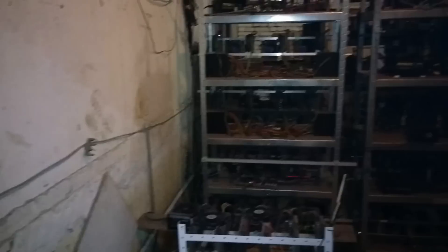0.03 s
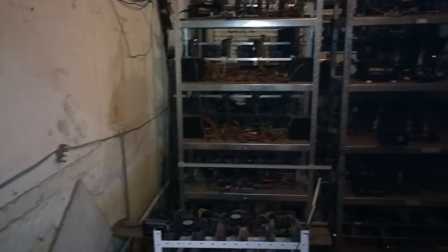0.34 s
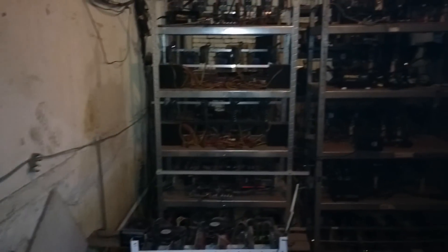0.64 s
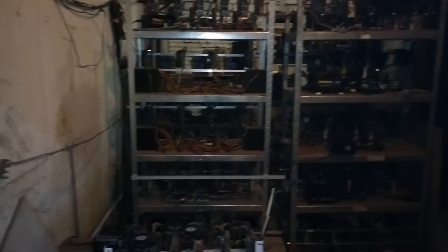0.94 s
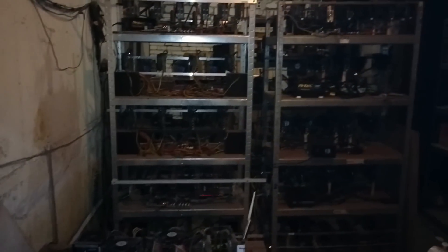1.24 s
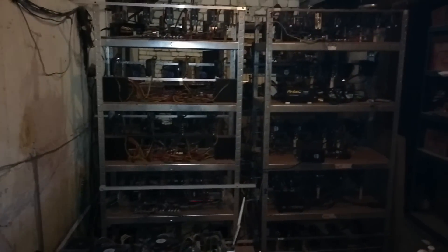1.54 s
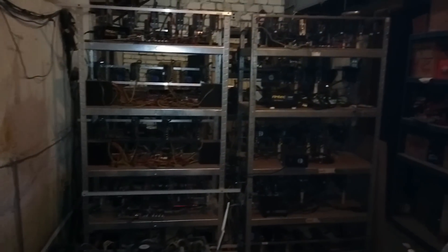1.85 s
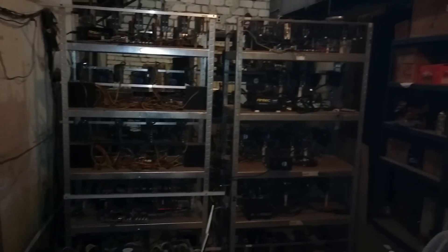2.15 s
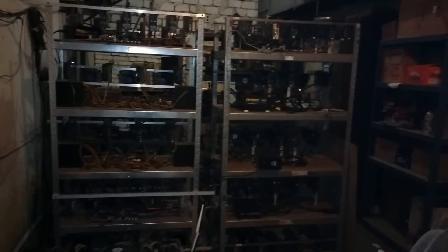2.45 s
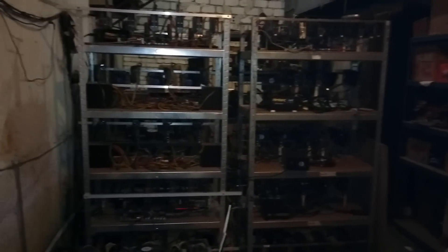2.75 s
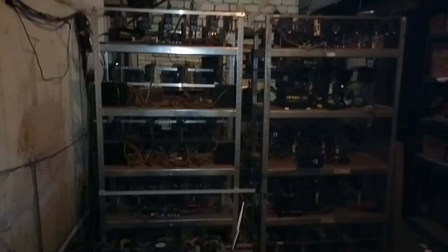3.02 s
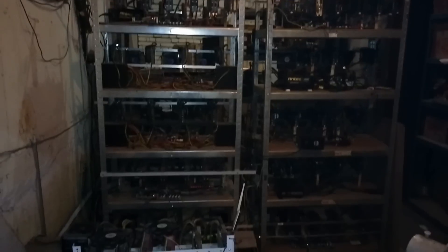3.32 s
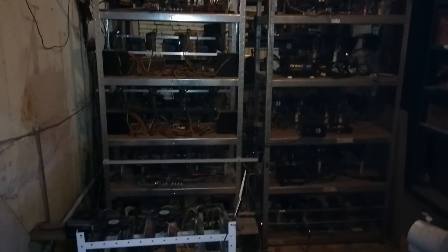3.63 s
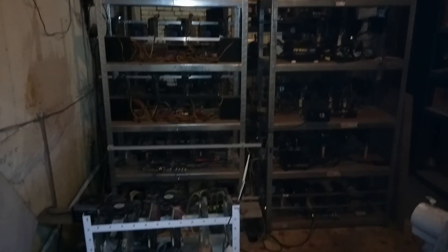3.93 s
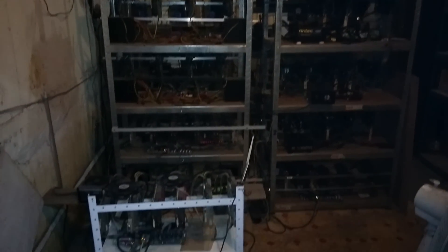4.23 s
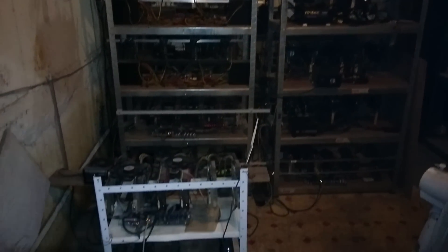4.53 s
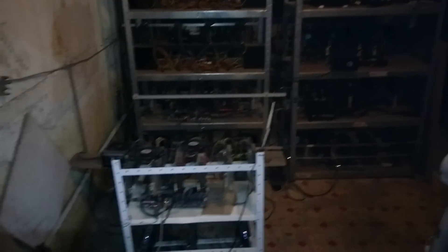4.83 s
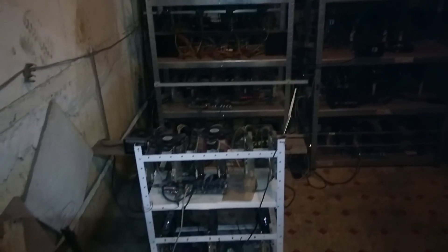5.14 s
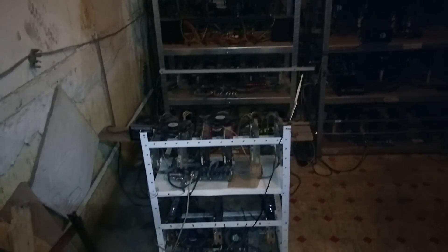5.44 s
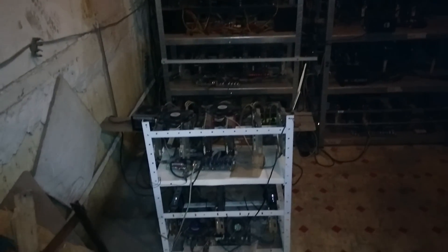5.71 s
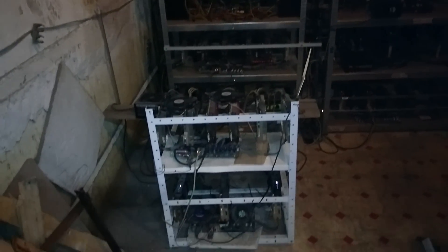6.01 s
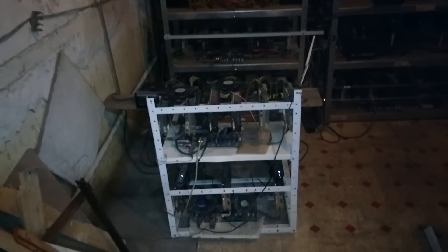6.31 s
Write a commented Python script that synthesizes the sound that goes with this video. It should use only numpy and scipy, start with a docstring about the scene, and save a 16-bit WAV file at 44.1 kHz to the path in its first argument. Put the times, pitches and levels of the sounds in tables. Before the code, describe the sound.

Racks of computer rigs fill a small bare room with the loud, steady roar of cooling fans. One strong fan gives a low hum that wavers and briefly drops out, while many smaller fans whirr over rushing air. A thin, grainy hiss comes and goes, and soft low buffets of draught bump now and then. The hand-held microphone moves slowly nearby, so the tone shifts slightly.

```python
"""Computer fans in a small bare room

Racks of computer rigs run while a hand-held microphone moves slowly in front of them. One strong fan
hums at its blade rate and a neighbour beats against it; many small ones whirr at speeds of their own
over a roar of turbulent air. The room booms at a few modes, the draught buffets now and then,
and a thin grainy hiss comes and goes."""
import sys
import numpy as np
from scipy import signal
from scipy.fft import rfft, irfft
from scipy.io import wavfile
from scipy.ndimage import uniform_filter1d, minimum_filter1d, map_coordinates

SR = 44100
rng = np.random.default_rng(int(sys.argv[2]) if len(sys.argv) > 2 else 0)


def int16_out(signal):
    """Quantize to a 16-bit WAV file."""
    q = np.round(np.clip(np.atleast_2d(signal).T, -1, 1) * 32767)
    wavfile.write(sys.argv[1], SR, q.astype(np.int16))


N = 280917
TIME_S = np.arange(N) / SR


def undb(db):
    """Amplitude ratio of a level in decibels."""
    return 10 ** (np.asarray(db) / 20)


def unit(x):
    """Normalisation to an rms of 1."""
    return x / np.sqrt(np.mean(x ** 2))


def envelopes(table):
    """Interpolation in decibels: one gain curve for each level column of a table."""
    times, *levels = np.transpose(table)
    return [undb(np.interp(TIME_S, times, db)) for db in levels]


def drift(rate_hz):
    """Smoothed sample-and-hold noise with an rms of 1."""
    hold = max(int(SR / rate_hz), 1)
    steps = rng.standard_normal(4096)[np.arange(N) // hold % 4096]
    return unit(uniform_filter1d(uniform_filter1d(steps, hold), hold))


# The strong fan's speed. Each row: time in seconds, blade rate in Hz.
BLADE_RATE = [(0, 187), (1, 186.6), (3.3, 186.75), (3.8, 187.05), (6.37, 187.05)]
# Its standing wave along the microphone's path. Each row: time in seconds, level in dB.
HUM_LEVEL = [(0.2, -20), (0.38, -14.5), (1.6, -14.5), (1.85, -31), (2.05, -15), (2.25, -24), (2.55, -11.5),
             (2.8, -17), (3.5, -20), (3.95, -16), (4.45, -18.5), (4.75, -24), (4.9, -12.5), (5.15, -13.5),
             (5.42, -25), (5.55, -13.5), (5.9, -12.5), (6.2, -15.5), (6.37, -16)]
# Brief dips of the hum. Each row: centre in seconds, half length in seconds, depth in dB.
HUM_DIPS = [(0.641, 0.027, 24), (0.933, 0.026, 15), (1.074, 0.012, 7), (1.264, 0.032, 11.5),
            (1.482, .012, 10), (2.148, 0.038, 38), (2.287, 0.09, 17), (2.86, 0.02, 8), (3.012, 0.025, 12),
            (3.433, 0.023, 35), (3.606, 0.043, 17), (3.898, 0.0089, 13), (4.107, 0.014, 26),
            (4.306, 0.057, 17), (4.792, 0.039, 29.5), (5.117, 0.054, 20), (5.217, 0.021, 15),
            (5.726, 0.036, 23), (6.003, 0.041, 8.5)]
def strong_fan(sway_rad, shake_rad, throb_db, waver_db):
    """Blade-passing tone: uneven inflow modulates its phase and amplitude; at times it drops out."""
    blade_hz = np.interp(TIME_S, *np.transpose(BLADE_RATE))
    phase = 2 * np.pi * np.cumsum(blade_hz) / SR + sway_rad * drift(4.5) + shake_rad * drift(26)
    flutter = undb(throb_db * drift(34) - waver_db * np.abs(drift(16)))
    dips_db = sum(db * np.exp(-((TIME_S - s) / half_s) ** 2) for s, half_s, db in HUM_DIPS)
    return envelopes(HUM_LEVEL)[0] * unit(np.sin(phase) * flutter) * undb(-dips_db)


def neighbour_fan(blade_hz, wander, throb_db):
    """Beating: a faster, less steady blade tone interferes with that of the strong fan."""
    phase = 2 * np.pi * np.cumsum(blade_hz * (1 + wander * drift(14))) / SR
    return unit(np.sin(phase) * undb(throb_db * drift(12)))


def small_fans(slow_hz, fast_hz, wander, count, harmonics):
    """Superposition: each fan adds a harmonic series on its own slightly wandering blade rate."""
    cycle = np.arange(1024) / 1024
    whirr = np.zeros(N)
    for blade_hz in rng.uniform(slow_hz, fast_hz, count):
        wave = sum(np.sin(2 * np.pi * (k * cycle + rng.random())) for k in range(1, harmonics + 1))
        passes = np.cumsum(blade_hz * (1 + wander * drift(9))) / SR
        whirr += wave[(passes * len(cycle)).astype(int) % len(cycle)]
    return unit(whirr)


def turbulence(flutter_db, rate_hz):
    """Turbulent flow: broadband noise whose amplitude flutters as eddies pass."""
    return unit(rng.standard_normal(N) * undb(flutter_db * drift(rate_hz)))


def warble(x, depth_db, band_hz, quick_s, slow_db, slow_s=.07):
    """Amplitude modulation by band: each swells and fades by itself, in short pitched flecks."""
    frames = dict(fs=SR, nperseg=512, noverlap=384)
    hz, times, spectrum = signal.stft(x, **frames)
    chance = rng.standard_normal((2, 512, 1024))
    grids = [np.meshgrid(hz / band_hz, times / s, indexing="ij") for s in (quick_s, slow_s)]
    quick, slow = [unit(map_coordinates(field, grid, order=3, mode="wrap"))
                   for field, grid in zip(chance, grids)]
    swell_db = depth_db * np.minimum(quick, 1.8) + slow_db * slow  # peaks level off, dips stay deep
    swell_db /= np.hypot(1, (hz[:, None] / 6100) ** 2)  # smoother in the high treble
    return unit(signal.istft(spectrum * undb(swell_db), **frames)[1][:N])


# Peaks and nulls of the room. Each row: centre in Hz, width in Hz, lift in dB.
ROOM_MODES = [(206.4, 11.2, 3), (253, 9.9, -1), (249, 21, 3.5), (289.5, 3.5, 7.5), (320.3, 15, -6),
              (335.4, 16, 6.5), (541.7, 13.3, 8), (573, 9.7, -10), (585, 30, 4.5), (774, 44, 6)]
def in_room(x, spectrum):
    """Room resonance: standing waves between the walls lift and notch a source's spectrum; rms 1."""
    hz = np.maximum(np.arange(N // 2 + 1) * SR / N, 1)
    knot_hz, knot_db = np.transpose(spectrum)
    shape_db = np.interp(np.log(hz), np.log(knot_hz), knot_db, left=-120, right=-120)
    for centre, width, lift in ROOM_MODES:
        shape_db += lift / (1 + (2 * (hz - centre) / width) ** 2)
    return unit(irfft(rfft(x) * undb(shape_db), N))


# Slow drift of the roar. Each row: time in seconds, relative levels of rumble, rush and edge in dB.
ROAR_LEVELS = [(0.1, -27.5, -37, -68), (0.24, -18, -26.5, -31), (0.5, -18, -27, -32),
               (0.68, -19, -31.5, -37.5), (1.1, -19.5, -28, -33), (1.3, -19.5, -28.5, -36),
               (1.55, -20, -26.5, -34), (2.3, -20, -28, -33), (2.65, -19.5, -23.5, -34.5),
               (2.92, -21, -29.5, -36), (3.1, -24, -27.5, -34.5), (3.85, -20, -28.5, -35),
               (4.08, -26, -29.5, -35.5), (4.35, -21, -27, -33), (4.95, -19.5, -27.5, -35.5),
               (5.2, -22.5, -28, -35.5), (5.6, -19, -26, -34), (6.37, -19.5, -23.5, -34)]
# Spectra of the wakes, blades and fins. Each row: frequency in Hz, relative level in dB.
RUMBLE_SPECTRUM = [(120, -24), (175, -10.5), (210, 2), (280, 0.5), (315, -5), (360, -3), (415, -7.5),
                   (445, -19), (600, -28), (900, -56)]
RUSH_SPECTRUM = [(300, -42), (440, -10.5), (520, -8.5), (630, -4), (700, 3.5), (770, -5), (825, 5.5),
                 (900, 2.5), (1010, -0.5), (1100, -20), (1500, -60)]
EDGE_SPECTRUM = [(800, -37), (1100, 1), (1450, 3), (1850, 2), (2100, -8), (2300, -11.5), (2750, -5.5),
                 (3300, -13), (3950, -14.5), (4400, -25), (5000, -26.5), (7000, -24), (15000, -66)]
def roar(whirr_db, rumble_db, rush_db, edge_db):
    """Aerodynamic noise: wakes rumble, blades rush and whirr, grilles and fins add a bright edge."""
    rumble, rush, edge = envelopes(ROAR_LEVELS)
    whirr = undb(whirr_db) * small_fans(slow_hz=211.2, fast_hz=417, wander=.006, count=20, harmonics=9)
    wakes = warble(turbulence(.84, 45), depth_db=5, band_hz=94.9, quick_s=.02, slow_db=-.44)
    blades = warble(turbulence(.37, 50) + whirr, depth_db=5, band_hz=97.5, quick_s=.021, slow_db=.57)
    fins = warble(turbulence(.75, 50) + whirr, depth_db=4.5, band_hz=161.1, quick_s=.02, slow_db=2.5)
    return (rumble * undb(rumble_db) * in_room(wakes, RUMBLE_SPECTRUM)
            + rush * undb(rush_db) * in_room(blades, RUSH_SPECTRUM)
            + edge * undb(edge_db) * in_room(fins, EDGE_SPECTRUM))


# The low rig as the microphone moves. Each row: time in seconds, relative level in dB.
LOW_RIG_LEVEL = [(.3, -31.5), (.9, -33), (1.4, -39.5), (5.2, -41.5), (5.7, -32), (5.97, -28.5),
                 (6.1, -28.5), (6.37, -25.5)]
# Spectrum of its air noise. Each row: frequency in Hz, relative level in dB.
LOW_RIG_SPECTRUM = [(290, -27), (370, 0), (430, 0), (520, -7.5), (900, -8), (1250, -9), (1600, -9),
                    (2200, -21.5), (2900, -17.5), (3600, -26.5), (4400, -41)]
def low_rig(gain_db):
    """Level falls with distance: this rig is close at first, falls behind and draws near again."""
    air = warble(turbulence(2.63, 45), depth_db=6, band_hz=126.9, quick_s=.022, slow_db=3.5)
    return envelopes(LOW_RIG_LEVEL)[0] * undb(gain_db) * in_room(air, LOW_RIG_SPECTRUM)


def eddy(hz, span):
    """Narrow-band noise, one second long: its pitch wanders while its envelope is held nearly even."""
    band = signal.butter(3, [hz / (1 + span), hz * (1 + span)], "bandpass", fs=SR, output="sos")
    analytic = signal.hilbert(unit(signal.sosfilt(band, rng.standard_normal(SR))))
    return unit(analytic.real / np.hypot(np.abs(analytic), .5))


def band_swells(table, span):
    """Wave packets: each is a narrow band of noise under a Gaussian envelope."""
    out = np.zeros(N + SR)
    from_peak_s = np.arange(SR) / SR - .5
    for peak_s, hz, db, half_s in table:
        start = min(int(peak_s * SR), N)
        out[start:start + SR] += undb(db) * np.exp(-(from_peak_s / half_s) ** 2) * eddy(hz, span)
    return out[SR // 2:][:N]


# Spectrum of the deep draught. Each row: frequency in Hz, relative level in dB.
DRAUGHT_SPECTRUM = [(20, -21), (45, -27.5), (62, -16.5), (75, -11.5), (105, -4.5), (135, -2.5), (170, -9),
                    (210, -10), (300, -36.5)]
# Its gusts. Each row: peak time in seconds, centre in Hz, level in dB, half length in seconds.
GUSTS = [(0.14, 120, -24, .07), (0.46, 120, -23, .06), (0.78, 125, -26, 0.054), (1.2, 85, -27.5, .025),
         (1.48, 75, -36, .06), (1.77, 85, -26, 0.027), (1.92, 124, -26, .03), (2.03, 131, -18, 0.027),
         (2.14, 130, -21, 0.028), (2.425, 135, -16, 0.019), (2.74, 125, -30, .03), (3.387, 130, -30, .03),
         (3.64, 125, -24, .027), (3.822, 113, -20.5, 0.027), (4.01, 85, -29, .03),
         (4.19, 124, -23.5, 0.044), (4.74, 105, -26.5, .03), (4.93, 129, -27, .015), (5.77, 130, -20, .03),
         (6.01, 130, -18.5, .025), (6.16, 135, -17, .03), (6.278, 125, -20, .022)]
def draught(rumble, level_db):
    """Large-scale turbulence: slow eddies from the racks rise with the rumble and gust now and then."""
    flow = undb(level_db) * unit(rumble) ** .9
    return flow * in_room(turbulence(2.5, 25), DRAUGHT_SPECTRUM) + band_swells(GUSTS, span=.28)


# Swells of the hiss. Each row: peak time, rise and fall in seconds, relative level in dB.
HISS_SWELLS = [(0.17, .12, 0.13, -41.5), (0.36, 0.48, 0.21, -38.5), (0.51, 0.065, 0.078, -44),
               (0.64, 0.055, .022, -45), (0.76, .04, 0.044, -59), (0.843, .006, 0.055, -48),
               (0.93, 0.047, .06, -53.5), (1.17, .04, 0.061, -55), (1.38, .02, 0.035, -60),
               (1.63, 0.081, 0.082, -52), (1.885, .01, .03, -55), (1.955, 0.031, 0.055, -44.5),
               (2.13, 0.069, 0.059, -53), (2.208, .036, .025, -44.5), (2.41, 0.054, 0.074, -49),
               (2.62, 0.029, 0.06, -59), (2.77, .05, 0.045, -56), (3.09, 0.083, 0.11, -43.5),
               (3.175, 0.042, 0.021, -46), (3.26, .04, 0.058, -50.5), (3.355, 0.05, 0.056, -49.5),
               (3.51, 0.053, 0.091, -48.5), (3.81, 0.072, 0.042, -50), (4.05, .05, 0.1, -57.5),
               (4.24, 0.065, 0.044, -46), (4.32, 0.081, 0.16, -42.5), (4.48, .022, 0.064, -42),
               (4.68, .05, 0.052, -64), (4.93, 0.12, .11, -54.5), (5.16, 0.15, 0.099, -47),
               (5.34, 0.076, .07, -56), (5.49, .05, .05, -51), (5.555, 0.034, 0.056, -44.5),
               (5.68, 0.087, .07, -52), (5.82, .05, .09, -50.5), (5.897, .028, 0.038, -46.5),
               (6.1, 0.045, .1, -54.5), (6.365, 0.055, .03, -46)]
# Spectra of the hiss and its brighter spray. Each row: frequency in Hz, relative level in dB.
HISS_SPECTRUM = [(3500, -41.5), (5000, -24.5), (5800, -3), (6500, 3.5), (7300, 5.5), (8500, -5),
                 (10000, -14), (12500, -22.5), (15500, -34.5)]
SPRAY_SPECTRUM = [(4500, -27.5), (5600, -27.5), (6500, -10), (7600, 2.5), (9500, -3), (12000, -13),
                  (15500, -29)]
def hiss(gain_db, spray_db, floor_db, spray_floor_db):
    """Modulated air noise: thin swells add in power over a steady floor, brighter when stronger."""
    power = undb(-64.5) ** 2  # at rest
    for peak_s, rise_s, fall_s, db in HISS_SWELLS:
        age = TIME_S - peak_s
        swell = np.exp(-np.abs(age / np.where(age < 0, rise_s, fall_s)) ** 1.38)  # a rounded peak
        power += (undb(db) * swell) ** 2
    flow = np.sqrt(power) * undb(1.2 * drift(70))
    grainy = (flow * undb(gain_db) + undb(floor_db)) * in_room(turbulence(1.1, 830), HISS_SPECTRUM)
    spray = undb(spray_db) * flow * (flow / undb(-35)) ** .32  # grows faster than the flow
    bright = np.hypot(spray, undb(spray_floor_db)) * in_room(rng.standard_normal(N), SPRAY_SPECTRUM)
    return grainy + bright


# Surges of the whirr. Each row: peak time in seconds, centre in Hz, level in dB, half length in seconds.
WHIRR_SURGES = [(0.463, 826, -23, 0.017), (0.544, 1540, -30.5, 0.044), (0.61, 2850, -38, .035),
                (0.77, 260, -20, 0.026), (0.763, 1480, -30.5, 0.039), (0.848, 860, -25, 0.046),
                (1.038, 349, -20, 0.034), (1.112, 840, -24, 0.026), (1.53, 820, -20, 0.019),
                (1.736, 800, -21.5, 0.014), (2.131, 2745, -43, .05), (2.3, 1620, -34, 0.057),
                (2.324, 840, -24.5, .018), (2.823, 258, -15, 0.016), (3.014, 833, -24, 0.041),
                (3.495, 341, -18.5, 0.029), (3.84, 350, -18, 0.035), (4.188, 2700, -40.5, 0.064),
                (4.832, 805, -18.5, 0.011), (5.9, 860, -25.5, 0.037), (5.97, 1380, -26, 0.028),
                (6.075, 2760, -41, 0.045), (5.62, 329, -23, 0.044), (6.114, 360, -22, 0.075),
                (6.3, 2820, -44, .07)]
def whirr_surges():
    """Narrow-band noise has a pitch: the whirr seems to swell briefly on one note."""
    return band_swells(WHIRR_SURGES, span=.13)


# Buffets of air. Each row: start in seconds, relative level in dB, centre in Hz.
BUFFETS = [(0.698, 5.5, 192), (0.812, -1, 334), (1.004, 2, 189), (1.184, -3, 794), (1.495, 3.5, 200),
           (1.724, 2, 180), (1.876, 7.5, 251), (2.052, 6.5, 272), (2.252, 4.5, 265), (2.443, 3.5, 216),
           (2.478, 6.5, 215), (2.585, 4.5, 195), (3.109, 1, 790), (3.453, 6, 240), (3.953, 2.5, 259),
           (4.191, 8, 235), (4.225, -6, 816), (4.376, 7, 192), (4.883, 2, 188), (4.976, 7, 203),
           (5.021, 3, 186), (5.025, -0.5, 860), (5.277, 7.5, 198), (5.429, 4.5, 250), (5.548, 4.5, 200),
           (5.618, 6, 195)]
def buffets(gain_db, rise_s, decay_s, span):
    """Exponential decay: sudden eddies thump softly, each in a narrow band, and die away in the room."""
    out = np.zeros(N)
    age = np.arange(SR // 4) / SR
    envelope = (1 - np.exp(-age / rise_s)) * np.exp(-age / decay_s)
    for start_s, db, hz in BUFFETS:
        start = int(start_s * SR)
        out[start:start + len(age)] += undb(gain_db + db) * envelope * eddy(hz, span)[-len(age):]
    return out


def scene():
    """Superposition: the pressures of all the fans and their air add at one point."""
    rumble = envelopes(ROAR_LEVELS)[0]
    hum = strong_fan(sway_rad=.32, shake_rad=.35, throb_db=3, waver_db=1.5)
    hum += rumble * undb(-7.5) * neighbour_fan(blade_hz=210.8, wander=.03495, throb_db=3)
    air = roar(whirr_db=-13, rumble_db=-.4, rush_db=1, edge_db=.5) + low_rig(gain_db=2)
    air += draught(rumble, level_db=-26.5)
    air += buffets(gain_db=-13.5, rise_s=.0024, decay_s=.016, span=.2) + whirr_surges()
    air += hiss(gain_db=-3, spray_db=-.5, floor_db=-71, spray_floor_db=-70)
    return (hum + air)[None]


def limiter(x, ceiling_db, hold_s):
    """Peak limiting: the gain falls smoothly around peaks that pass the ceiling."""
    hold = max(int(hold_s * SR), 2)
    gain = minimum_filter1d(1 / np.maximum(np.abs(x) / undb(ceiling_db), 1), hold)
    return x * uniform_filter1d(uniform_filter1d(gain, hold // 2), hold // 2)


def record(dry):
    """Band and peak limiting: the microphone opens, fades up, holds peaks and cuts deep bass and top."""
    open_s, fade_s = .075, .34
    age = TIME_S - open_s
    fade_in = np.clip(age / .0029, 0, 1) * np.clip(.08 + age / fade_s, 0, 1)
    thinned = signal.sosfilt(signal.butter(1, 30, "highpass", fs=SR, output="sos"), dry * fade_in)
    held = limiter(thinned, ceiling_db=-3.9, hold_s=.008)
    return signal.sosfilt(signal.ellip(8, .2, 70, 15700, fs=SR, output="sos"), held)


dry = scene()
out = record(dry)
int16_out(out)
```